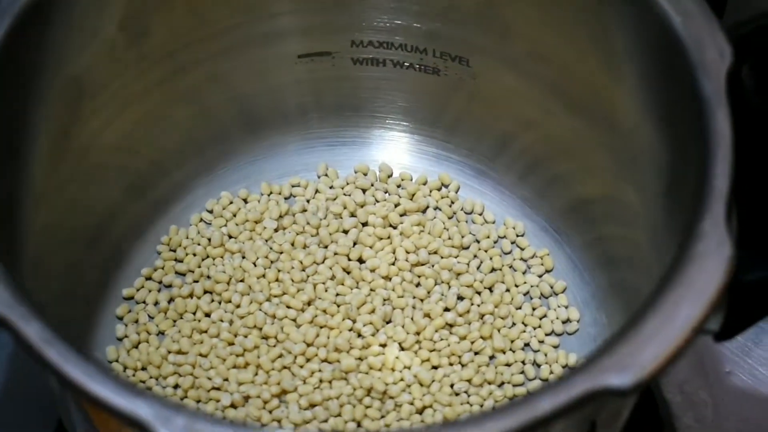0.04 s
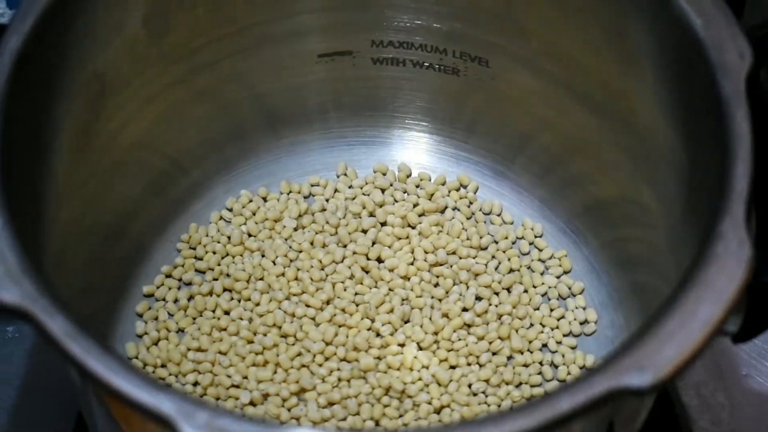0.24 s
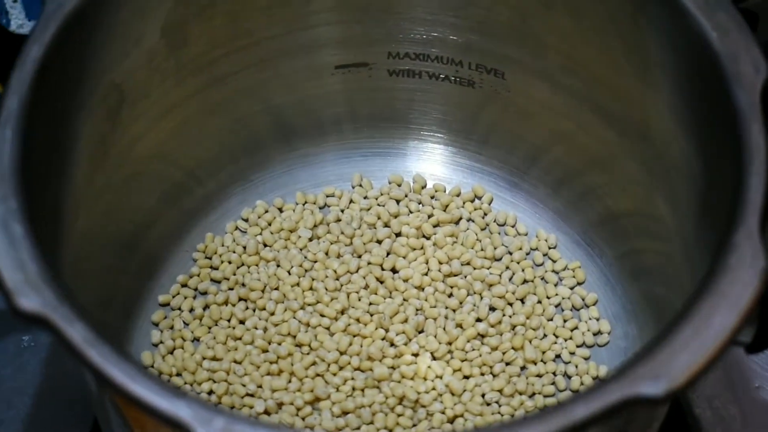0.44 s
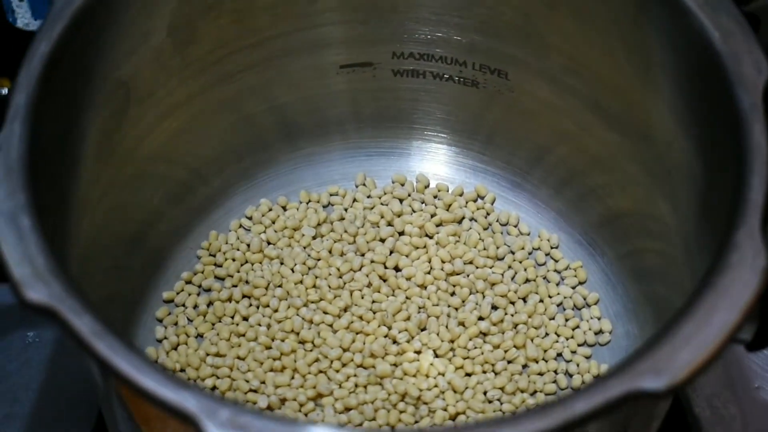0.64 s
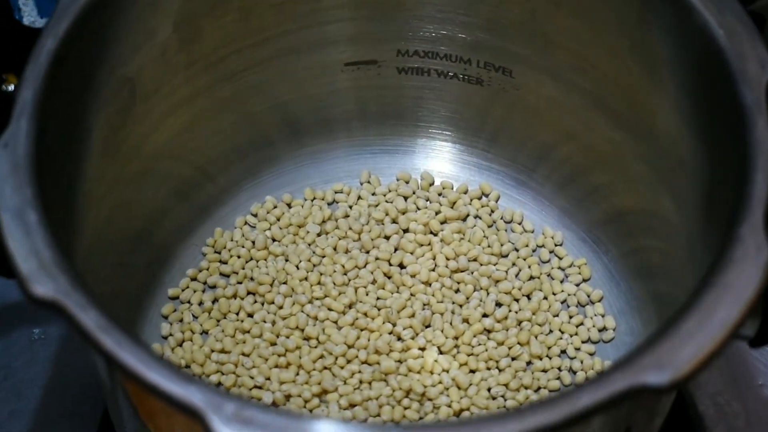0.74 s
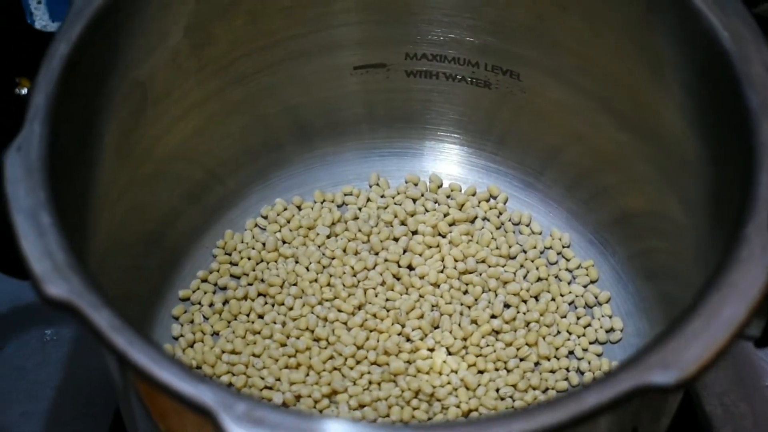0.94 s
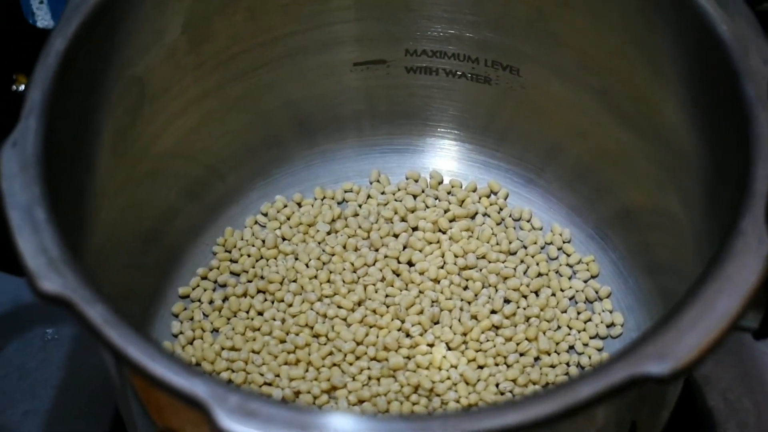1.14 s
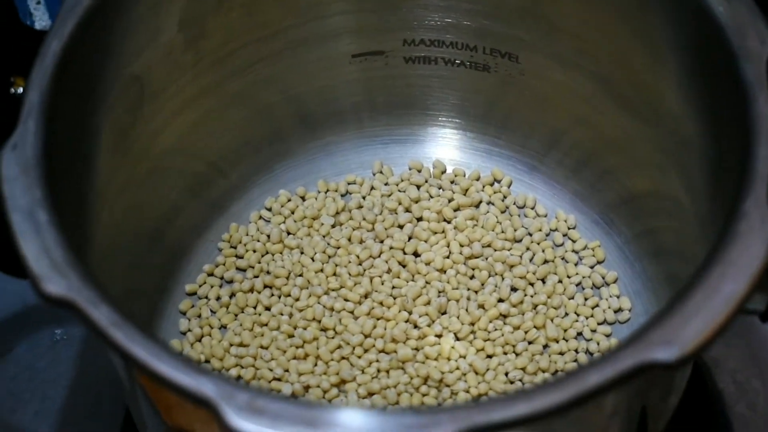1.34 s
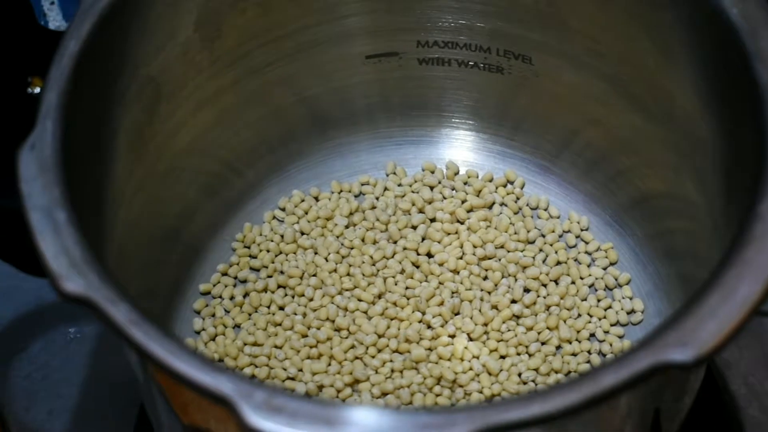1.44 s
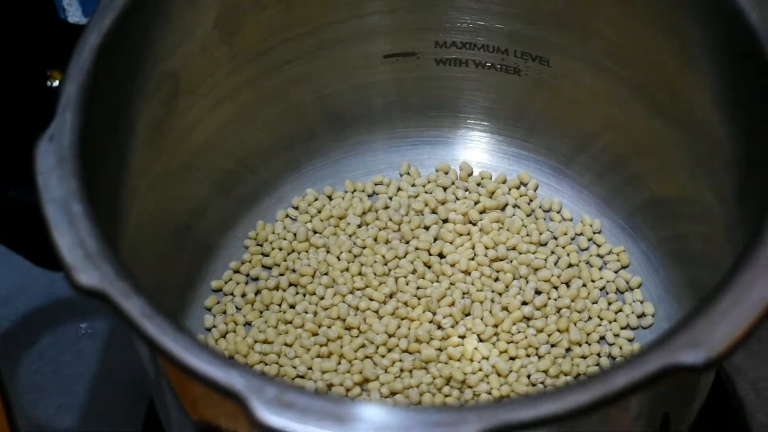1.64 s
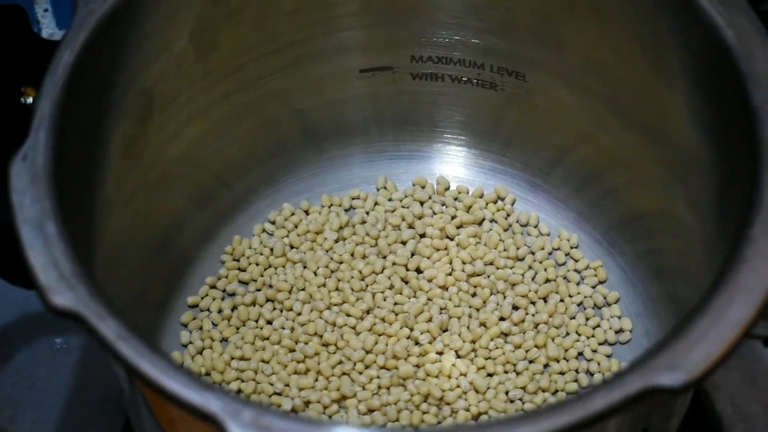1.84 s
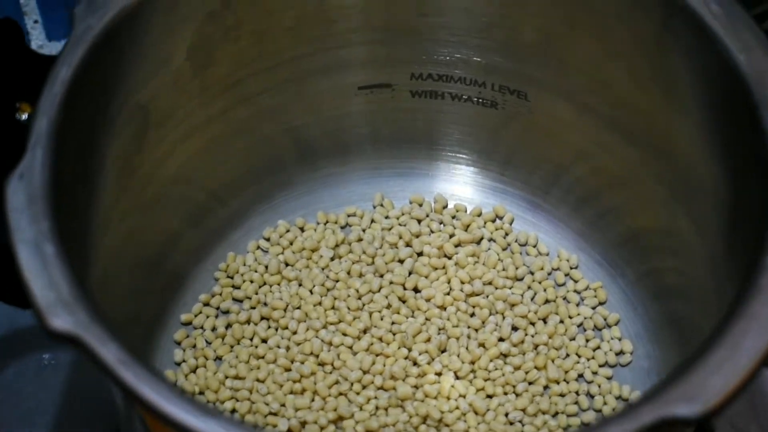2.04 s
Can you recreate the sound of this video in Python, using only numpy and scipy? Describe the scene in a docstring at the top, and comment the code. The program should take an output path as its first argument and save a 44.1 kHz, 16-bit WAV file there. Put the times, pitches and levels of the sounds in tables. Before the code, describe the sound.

Steel pot clatters and scrapes on a kitchen counter, ending in one heavy metallic clack

```python
"""Steel cookware is shifted on a kitchen counter near a mono camera microphone: thin steel clatters, slides and
rings, a duller base knocks, and a last heavy clack dies in the small hard room over hiss, faint tones and ticks.
Blows are short bursts of random contacts and slides are streams of tiny slips; both pass through the resonances
of their part and a decaying noise tail for the room. Rings are damped sines; the kitchen is shaped noise
with wavering tones and tiny sine pulses."""
import sys
import numpy as np
from scipy import signal
from scipy.fft import rfft, irfft, next_fast_len
from scipy.io import wavfile
from scipy.ndimage import map_coordinates

SR = 44100
rng = np.random.default_rng(int(sys.argv[2]) if len(sys.argv) > 2 else 0)


def nominal_scale(level):
    """Amplitude ratio for a level in decibels (scalar or array-like)."""
    x = np.asarray(level, float) / 20
    return 10 ** x


def inscribe(sig):
    """Save sig as 16-bit PCM at rate SR to the path in sys.argv[1].

    A 1-D sig is mono; a 2-D sig holds one channel per row.
    Samples are clipped to [-1, 1] before scaling.
    """
    pcm = np.round(np.clip(np.atleast_2d(sig).T, -1, 1) * 32767)
    wavfile.write(sys.argv[1], SR, pcm.astype(np.int16))


N = 92477  # length [samples]

SLIDE_ROOM_DB = -10.5  # room tail under slides and rings


def unit(x):
    """Scale to rms 1."""
    return x / np.sqrt(np.mean(x ** 2) + 1e-20)


def along(points, hz):
    """Read a curve of (frequency [Hz], value) points on a log frequency axis."""
    point_hz, value = np.transpose(points)
    return np.interp(np.log(hz + 1), np.log(point_hz + 1), value)


def wobble(rate):
    """A smooth random curve through rate knots a second."""
    knots = rng.standard_normal(int(N * rate / SR) + 4)
    return map_coordinates(knots, [np.arange(N) * rate / SR])


def contacts(count, rate, spread_db):
    """Dense tiny impacts: impulses of random sign and size, about rate a second, rms 1."""
    u = rng.random((count, 2))
    hit = u[:, 0] < rate / SR
    sign = np.sign(u[:, 1] - .5)
    size = nominal_scale(spread_db * rng.standard_normal(count))
    return unit(hit * sign * size)


def sounded(force, modes, body, body_db, tilt_db):
    """A part answers a force: a causal response of power 1, broad body plus resonances of new strength."""
    mode_spread_db, small_hz = 2, 130  # low cut on the struck and rubbed parts, below about small_hz
    m = next_fast_len(len(force) + 8192, real=True) // 2 * 2
    hz = np.fft.rfftfreq(m, 1 / SR)
    power = nominal_scale(2 * (along(body, hz) + body_db))
    for (center, width, db), r in zip(modes, rng.standard_normal(len(modes))):
        peak = nominal_scale(2 * (db + mode_spread_db * r))
        power = power + peak / (1 + (2 * (hz - center) / width) ** 2) ** 2
    power *= nominal_scale(2 * tilt_db * np.log2((hz + 500) / 2500))
    power *= (hz ** 2 / (hz ** 2 + small_hz ** 2)) ** 2

    # minimum phase: fold the cepstrum onto positive time
    cepstrum = irfft(.5 * np.log(power / power.mean() + 1e-12), m)
    cepstrum[1:m // 2] *= 2
    cepstrum[m // 2 + 1:] = 0
    response = np.exp(rfft(cepstrum))
    return irfft(rfft(force, m) * response, m)[:len(force)]


def room(x, wet_db):
    """Direct sound plus a fresh noise tail of the small hard room, each frequency dying at its own speed."""
    # decay of the room: (frequency [Hz], t60 [s])
    decay = [(200, 0.44), (530, 0.44), (1400, 0.3), (3700, 0.24), (9700, 0.22), (16000, 0.11)]
    delay_s = .003
    hz, t, z = signal.stft(rng.standard_normal(SR // 2), SR, nperseg=128)
    fading = z * nominal_scale(-60 * t / along(decay, hz)[:, None])
    tail = signal.istft(fading, SR, nperseg=128)[1]
    tail = np.pad(tail, (round(delay_s * SR), 0))
    return x + nominal_scale(wet_db) * signal.fftconvolve(x, tail / np.linalg.norm(tail))[:len(x)]


def blows(rows, modes, body):
    """Each blow is a short chatter of clumped contacts that swells, holds and stops, heard in the room."""
    contacts_per_s, size_spread_db = 12000, 3
    clumps_per_s, clump_db = 350, 2  # contacts come in clumps
    body_db, room_db = -0.5, -3  # broad response under the resonances, room tail
    out, t = np.zeros(N + SR), np.arange(SR // 2) / SR
    for start, db, rise, hold, tilt_db in rows:
        swell = np.clip(t / max(rise, 1e-4), 0, 1)
        stop = nominal_scale(-60 * np.clip(t - rise - hold, 0, None) / 0.033)  # 60 dB down in 33 ms
        level = nominal_scale(db + clump_db * wobble(clumps_per_s)[:len(t)])
        force = level * swell * stop * contacts(len(t), contacts_per_s, size_spread_db)
        blow = sounded(force, modes, body, body_db, tilt_db)
        out[round(start * SR):][:len(t)] += room(blow, room_db)
    return out[:N]


def hiss():
    """Steady kitchen hiss: noise shaped in frequency, its level drifting slightly."""
    # spectrum of the hiss before levelling: (frequency [Hz], relative density [dB per Hz])
    spectrum = [(12, -56), (20, -36), (81, -20.5), (120, -32), (164, -11.5), (211, -27.5), (243, -12),
                (391, -12), (490, -8.5), (648, -7), (1070, -9.5), (1170, -11), (1550, -11), (1830, -13),
                (10700, -24), (16300, -40)]
    shape = nominal_scale(along(spectrum, np.fft.rfftfreq(N, 1 / SR)))
    noise = irfft(rfft(rng.standard_normal(N)) * shape, N)
    return nominal_scale(-55.2 + 0.57 * wobble(7.15)) * unit(noise)


def faint_tones():
    """Faint sines whose pitch and level waver at random."""
    # tones: (start [s], end [s], frequency [Hz], level [dB]), frequency and level before wavering;
    # the fade opens 60 ms ahead of the start and is shut 18 ms after the end
    tones = [(0, .26, 500, -61), (0, .27, 1095, -59), (1.45, 2.1, 1560, -64), (1.55, 2, 965, -64),
             (1.42, 1.85, 630, -62)]
    t, out = np.arange(N) / SR, np.zeros(N)
    for start, end, hz, db in tones:
        fade = np.clip(np.minimum(t - start + 0.06, end - t + 0.018) / 0.013, 0, 1)
        level = nominal_scale(db + 3.5 * wobble(25))
        phase = 2 * np.pi * np.cumsum(hz + 8 * wobble(30)) / SR
        out += fade * level * np.sin(phase)
    return out


def ticks():
    """Faint ticks: sine pulses under a bell-shaped envelope."""
    # ticks: (time of the peak [s], level [dB], frequency [Hz])
    pulses = [(.09, -59, 10950), (1.685, -58, 3300), (1.728, -59, 3340), (1.826, -58.5, 3250),
              (1.906, -55, 3300), (1.996, -60, 3300)]
    bell_s = 0.0066  # from the peak to 1/e
    t, out = np.arange(N) / SR, np.zeros(N)
    for peak, db, hz in pulses:
        out += nominal_scale(db) * np.exp(-((t - peak) / bell_s) ** 2) * np.sin(2 * np.pi * hz * t)
    return out


def base_knocks():
    """The duller base knocks on the counter: contact chatter through its resonances."""
    # knocks: (time [s], force level [dB], rise [s], chatter [s], brightness [dB per octave])
    knocks = [(.4273, -22.5, 0.00017, 0.0085, -1), (.4677, -23.5, .0005, 0.0051, 1.5),
              (.492, -32, 0.0013, 0.018, -3.5), (.676, -45, .002, .004, 1),
              (.6827, -32, 0.00033, 0.0052, -2.5), (.70, -38.5, 0.003, 0.018, -6.5)]
    # resonances of the base: (frequency [Hz], width [Hz], relative level [dB])
    modes = [(872, 130, 0), (1420, 43, 0), (2310, 140, -2), (2690, 21, -3), (2810, 140, -3), (3660, 63, -7),
             (4310, 140, -9), (4630, 64, -11), (5930, 150, -12), (6620, 68, -13)]
    # broad response of the base: (frequency [Hz], relative density [dB per Hz])
    body = [(35, -78), (60, -46.5), (357, -11), (773, -16.5), (869, -5.5), (1150, -6.5), (1420, -8),
            (2330, -6.5), (5170, -16.5), (9280, -22.5), (11700, -32), (16300, -64)]
    return blows(knocks, modes, body)


def slides():
    """Steel dragged over a hard surface: uneven slips into narrow resonances, brighter or duller with the contact."""
    # one path per slide, level before the trim below: (time [s], level [dB], bright share [0-1])
    paths = [
        [(0.55, -37, 0.5), (0.634, -53, 0.6), (0.64, -62, 0.5)],
        [(0.81, -32.5, 0.4), (0.836, -44.5, 0.2), (0.884, -32.5, 0.14), (0.918, -46.5, 0.1), (0.925, -33, 0.2)],
        [(1.01, -29, 0.1), (1.028, -31, 0.87), (1.162, -36.5, 0.35), (1.172, -32, 0.26), (1.204, -34, 0),
         (1.324, -63, 0), (1.33, -65, 0.4)],
    ]
    # resonances of the rubbed steel: (frequency [Hz], width [Hz], relative level [dB])
    modes = [(3570, 45, -5), (4460, 59, -3), (5580, 50, -13), (6210, 33, -6), (6910, 49, -4), (7260, 35, 0),
             (8760, 62, -16), (9360, 35, -8), (10100, 39, -2), (12000, 33, -24), (12600, 40, -20),
             (13000, 53, -22), (13500, 33, -27), (14700, 77, -25)]
    # broad response of the rubbed steel: (frequency [Hz], relative density [dB per Hz])
    body = [(35, -79), (60, -48), (519, -21), (773, -24), (1420, -9.5), (1880, -1.5), (2940, -13),
            (4490, -12), (5950, -22), (7170, -14.5), (8450, -26), (10400, -19), (11200, -31), (15200, -42),
            (16300, -57)]
    slips_per_s, slip_spread_db = 9000, 3
    tilt = 3.5  # [dB per octave], up for the bright share and down for the rest
    trim_db = -3.5
    t, out = np.arange(N) / SR, np.zeros(N)
    for path in paths:
        time, db, bright = np.transpose(path)
        level = nominal_scale(np.interp(t, time, db, left=-120, right=-120) + 0.99 * wobble(58.7))
        share = np.clip(np.interp(t, time, bright), 0, 1)
        for part, tilt_db in ((share, tilt), (1 - share, -tilt)):
            force = level * np.sqrt(part) * contacts(N, slips_per_s, slip_spread_db)
            out += sounded(force, modes, body, 0, tilt_db)
    return nominal_scale(trim_db) * room(out, SLIDE_ROOM_DB)


def rings():
    """Single modes ringing after blows and during slides: damped sines with a soft start."""
    # ringing modes: (time [s], frequency [Hz], level [dB], t60 [s])
    ringing = [(.282, 2086, -21.5, 0.17), (.316, 2058, -30, 0.32), (.43, 862, -29, .15),
               (.429, 2320, -29.5, 0.1), (.47, 2795, -33, .08), (.535, 2117, -27, 0.13),
               (.538, 5700, -36, 0.081), (.555, 7740, -43.5, 0.32), (.684, 1828, -29.5, 0.094),
               (.285, 4400, -31, .08), (.288, 5680, -32, .08), (.853, 1600, -40, .1),
               (.759, 2324, -22.5, 0.17), (.73, 8050, -18, 0.11), (.934, 8050, -15, 0.062),
               (.988, 2106, -16.5, 0.12), (.988, 1177, -29.5, 0.17), (1.1, 1718, -36, 0.35),
               (1.123, 4465, -41, .12), (1.2, 4440, -44, .12), (1.13, 3570, -45, .3), (1.17, 3570, -43, .4),
               (1.167, 4445, -35, .2), (1.09, 10150, -37, .2), (1.14, 10120, -43, 0.29),
               (1.165, 2196, -33.5, 0.24), (1.164, 1860, -32, .3), (1.34, 420, -29, .1),
               (1.3412, 800, -22, .1), (1.345, 1520, -44, 0.21), (1.345, 1720, -28, 0.13)]
    longest_s = .45  # upper limit on t60; all the rings listed are shorter
    out, t = np.zeros(N + SR), np.arange(SR // 2) / SR
    for start, hz, db, t60 in ringing:
        decay = nominal_scale(db - 60 * t / min(t60, longest_s))
        onset = 1 - np.exp(-t / 0.001)
        out[round(start * SR):][:len(t)] += decay * onset * np.sin(2 * np.pi * hz * t)
    return room(out[:N], SLIDE_ROOM_DB)


def heavy_clack():
    """The last heavy clack: two overlapping bursts of contacts through heavy, lower resonances."""
    # bursts: (time [s], force level [dB], rise [s], chatter [s], brightness [dB per octave])
    bursts = [(1.34, -16.5, 0.00074, 0.0079, 6), (1.342, -17, 0.0015, 0.014, -1.5)]
    # resonances of the heavy part: (frequency [Hz], width [Hz], relative level [dB])
    modes = [(409, 53, -15), (834, 88, -16), (1040, 51, -15), (1400, 15, -7), (1530, 33, 0), (1680, 21, -3),
             (2340, 42, -5), (2580, 22, -7), (2860, 97, -9), (3090, 29, -12)]
    # broad response of the heavy part: (frequency [Hz], relative density [dB per Hz])
    body = [(35, -82), (60, -57), (121, -41), (392, -18), (933, -18), (1050, -11), (1150, -17.5),
            (1530, -0.5), (1840, -7.5), (2270, -3), (4820, -24), (9280, -39), (15200, -63), (16300, -86)]
    return blows(bursts, modes, body)


def steel_clatters():
    """Thin steel clatters: contact chatter through many resonances reaching into the treble."""
    # clatters: (time [s], force level [dB], rise [s], chatter [s], brightness [dB per octave])
    clatters = [(.258, -43.5, 0.0045, 0.014, -8.5), (.273, -30, .005, 0.0049, -2.2),
                (.282, -22, 0.0031, .011, -2.4), (.3143, -17.5, 0.0011, 0.025, 0.5),
                (.533, -32, .008, .01, -.7), (.7285, -22.5, 0.0017, 0.019, 0.5),
                (.758, -28.5, 0.0039, 0.023, -3.5), (.9255, -21.5, 0.0024, 0.028, 0),
                (.986, -23, 0.0034, 0.004, -3.5)]
    # resonances of the thin steel: (frequency [Hz], width [Hz], relative level [dB])
    modes = [(899, 75, -7), (1170, 39, -4), (2080, 73, 0), (3590, 48, -6), (4400, 94, -7), (5680, 160, -6),
             (6060, 93, -9), (6880, 70, -7), (7810, 39, -7), (8040, 98, -4), (8680, 36, -9),
             (9380, 25, -14), (10100, 88, -12), (13400, 48, -24)]
    # broad response of the thin steel: (frequency [Hz], relative density [dB per Hz])
    body = [(35, -81), (60, -43), (626, -11), (773, -13), (890, -7), (1000, -13.5), (1180, -4),
            (1560, -6.5), (2070, -5.5), (2680, -11), (3550, -7), (8070, -8.5), (13800, -23.5), (16300, -52)]
    return blows(clatters, modes, body)


def scene():
    """Everything reaches one microphone, the same in both channels."""
    kitchen = hiss() + faint_tones() + ticks()
    cookware = base_knocks() + slides() + rings() + heavy_clack() + steel_clatters()
    mono = kitchen + cookware
    return np.array([mono, mono])


def top_cut(x):
    """Nothing passes above the cut-off."""
    return signal.sosfilt(signal.butter(12, 16470, fs=SR, output="sos"), x)


def record(dry):
    """The finished mix as the camera stores it."""
    return top_cut(dry)


dry = scene()
out = record(dry)
inscribe(out)
```